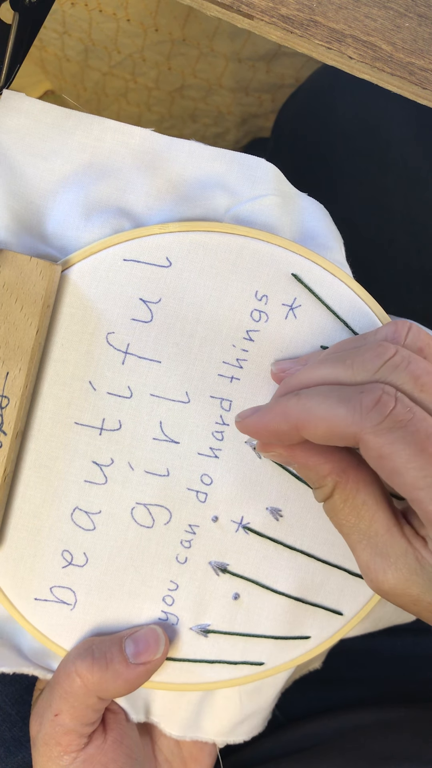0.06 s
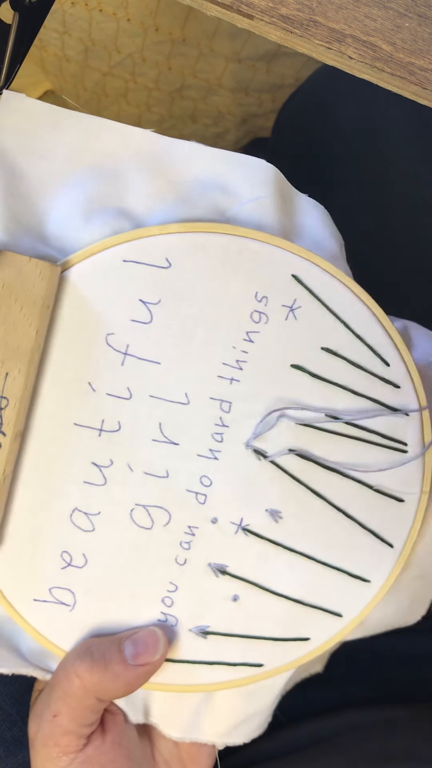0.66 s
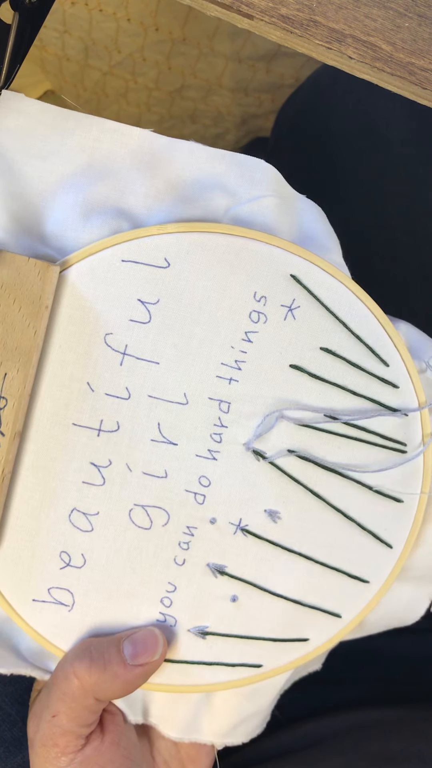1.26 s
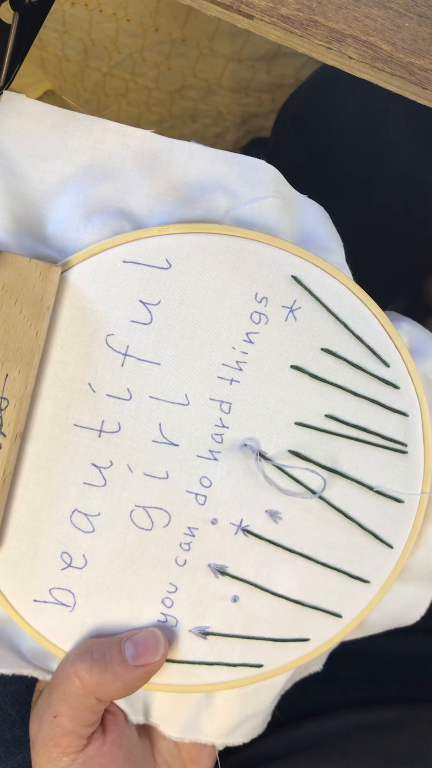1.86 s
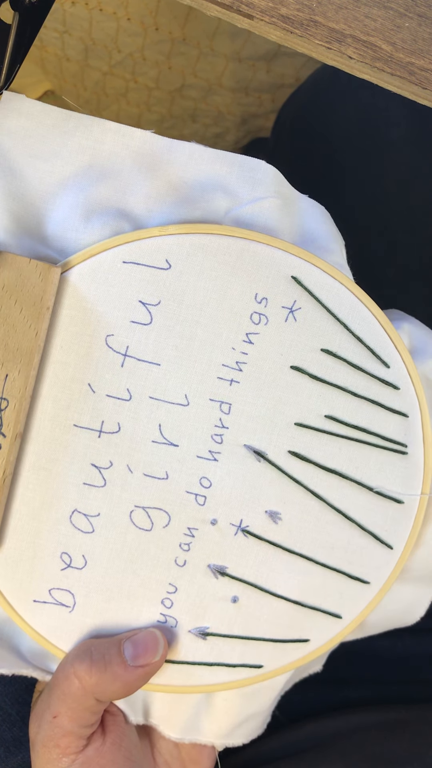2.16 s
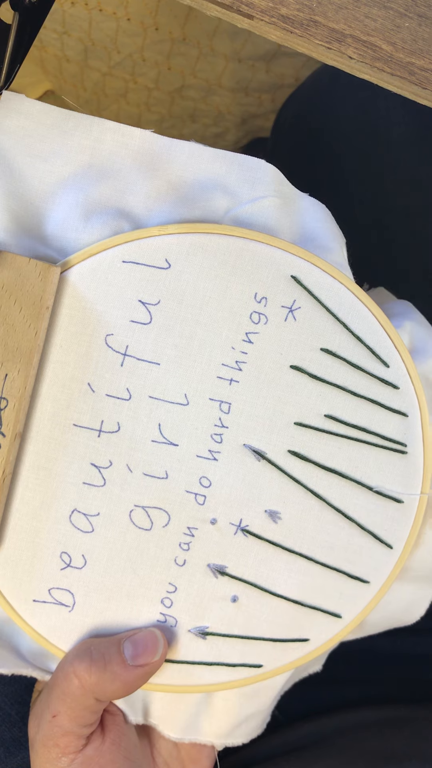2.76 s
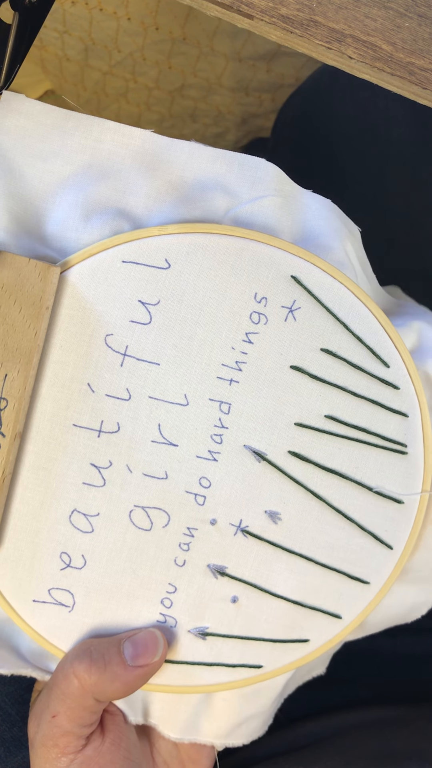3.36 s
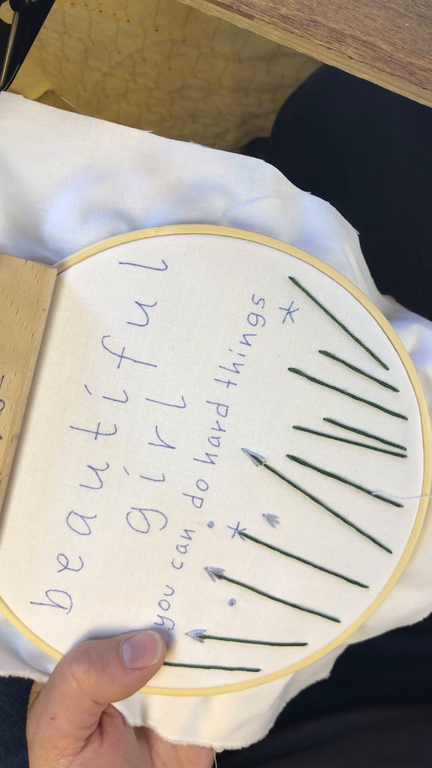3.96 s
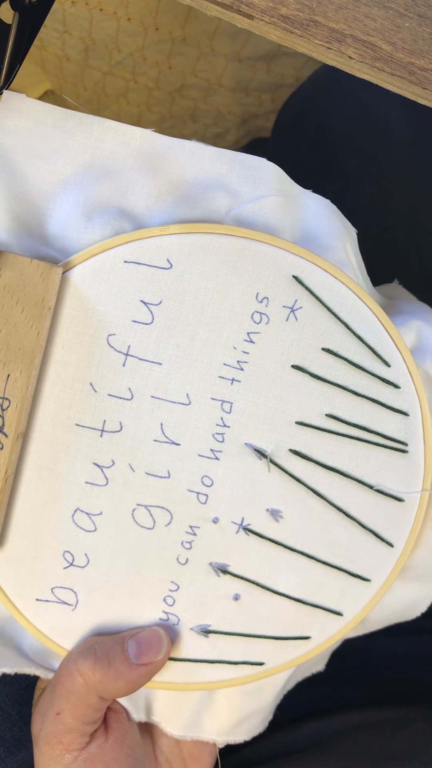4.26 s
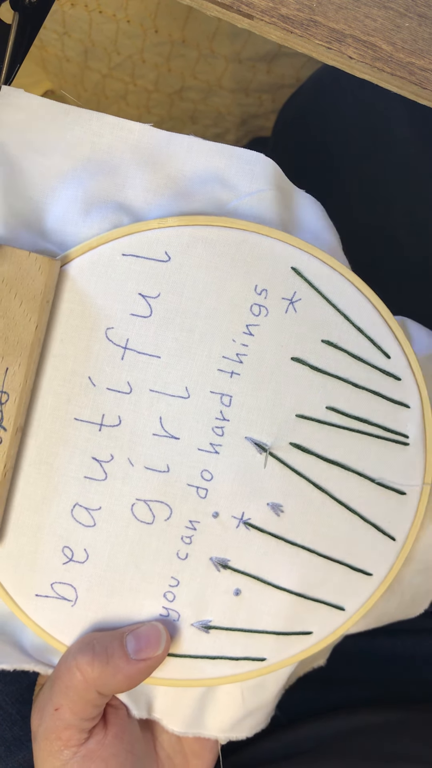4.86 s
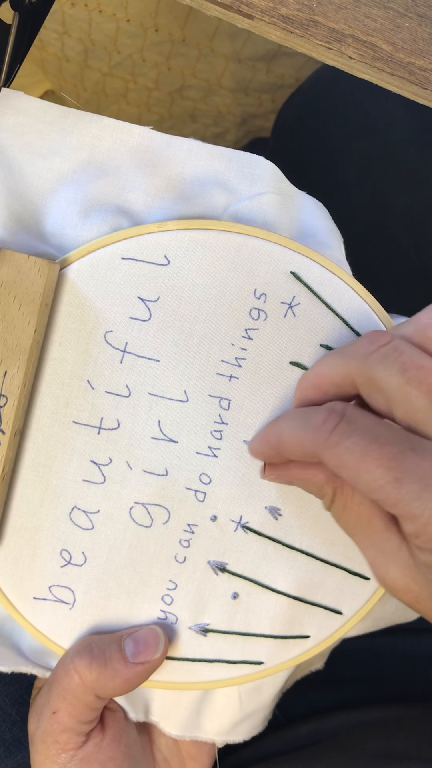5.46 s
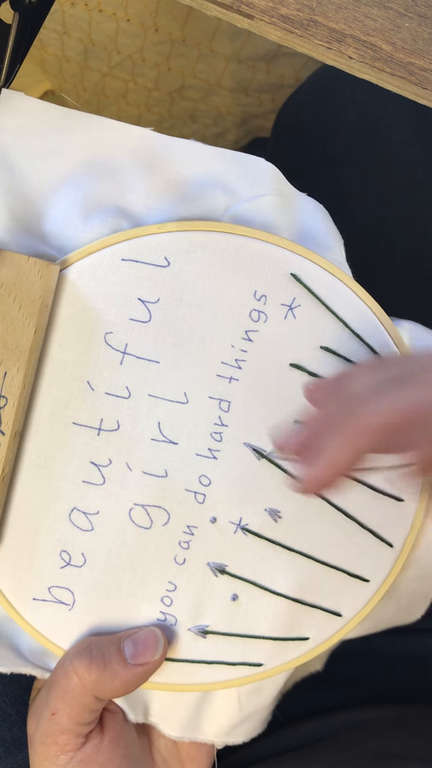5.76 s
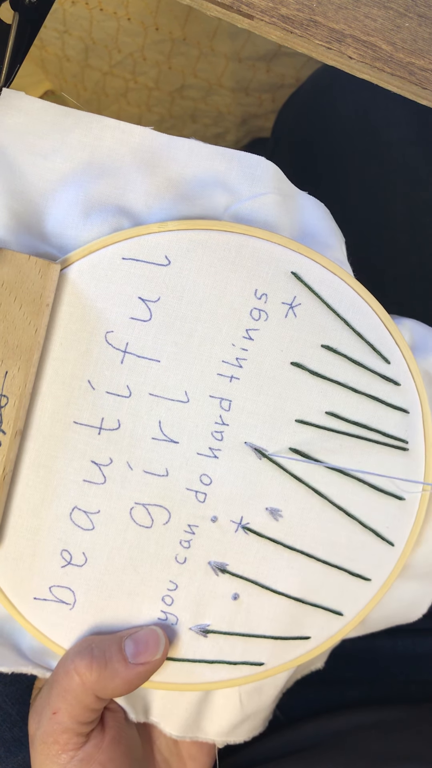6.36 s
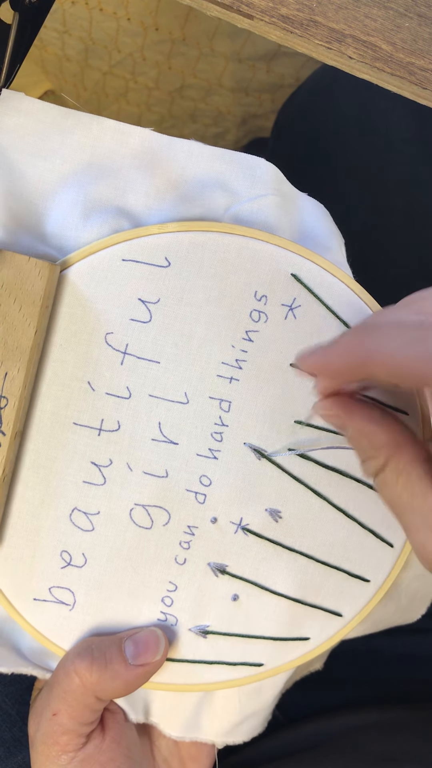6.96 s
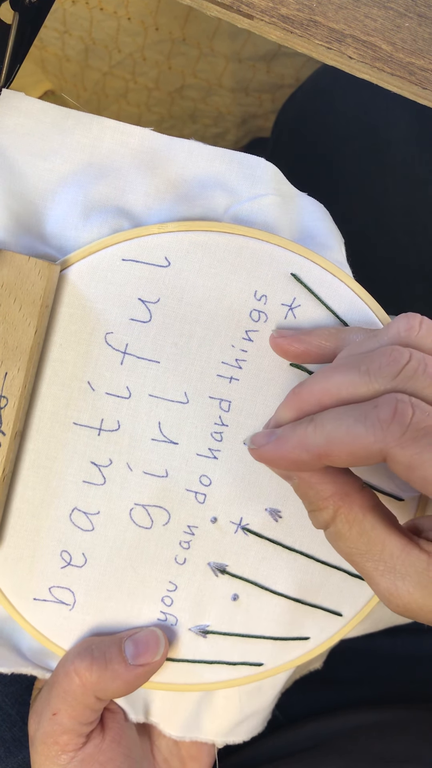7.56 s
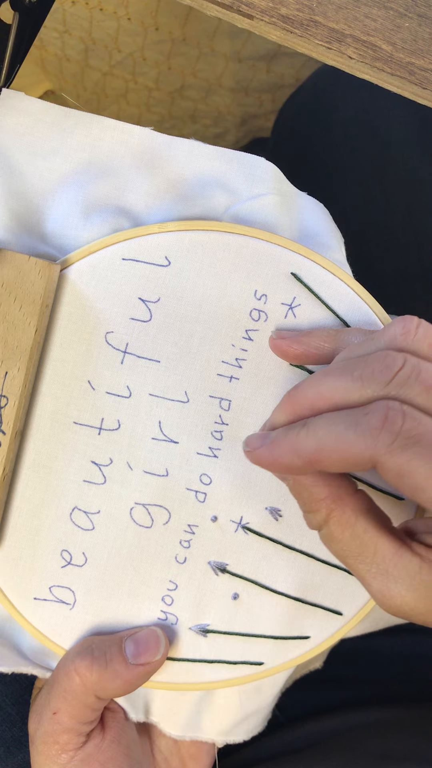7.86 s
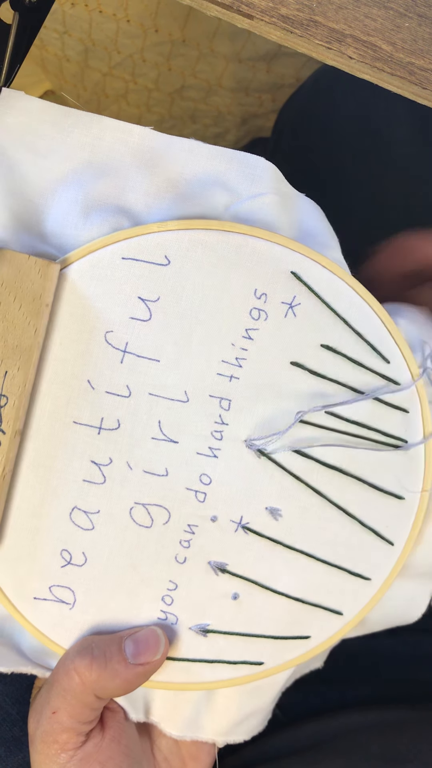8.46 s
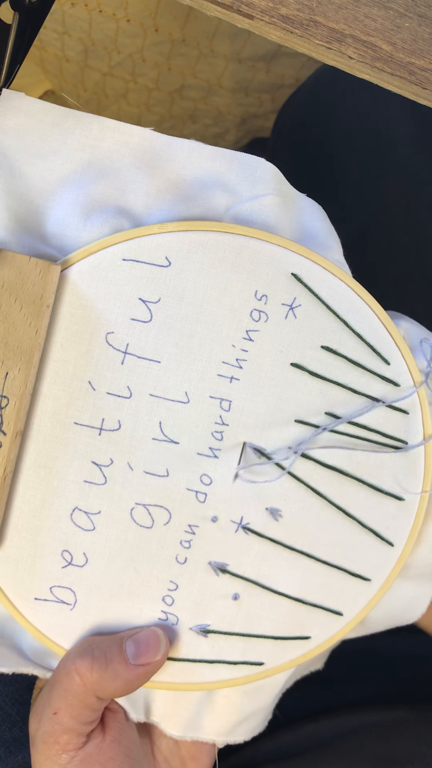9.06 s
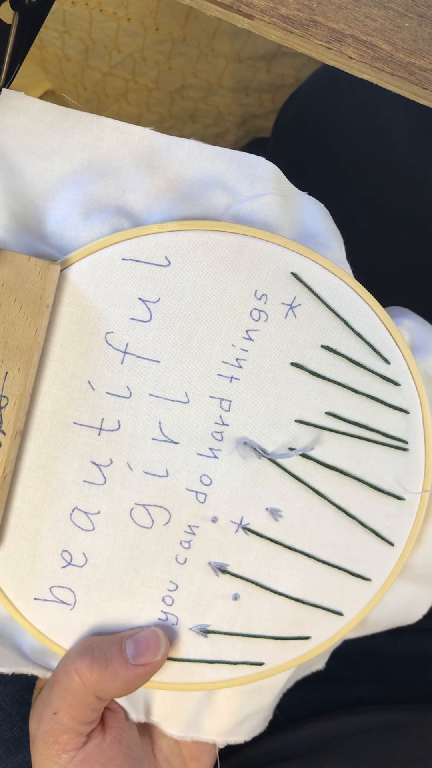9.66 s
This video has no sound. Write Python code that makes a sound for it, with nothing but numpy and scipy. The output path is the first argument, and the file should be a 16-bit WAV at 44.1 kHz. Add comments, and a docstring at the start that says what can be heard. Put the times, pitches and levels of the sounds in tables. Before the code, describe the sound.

A needle pops through cloth stretched in a wooden hoop, making it thump like a small drum, and thread rasps softly after it. This happens three times, a few seconds apart. Between the stitches come light pricks, faint finger rubs and one sharp click of the needle. The sounds are close, in a quiet room with a low rumble and faint appliance hum.

```python
"""Hand embroidery in a quiet room.

Cotton stretched in a wooden hoop rings like a small, slack drum. The needle pricks it and pops
through three times; the thread rasps after it through the weave. Between stitches the needle clicks
on nail and hoop, and fingers bump and rub the cloth. Behind: low rumble and an appliance hum."""
import sys
import numpy as np
from scipy import signal
from scipy.fft import rfft, irfft, next_fast_len
from scipy.io import wavfile
from scipy.ndimage import map_coordinates

SR = 44100
rng = np.random.default_rng(int(sys.argv[2]) if len(sys.argv) > 2 else 0)


def log_audio(samples):
    """Write samples as a 16-bit WAV file to the path given in sys.argv[1]."""
    # one column per channel
    frames = np.atleast_2d(samples).T
    # limit to full scale, then quantise
    limited = np.clip(frames, -1, 1)
    pcm = np.round(limited * 32767).astype(np.int16)
    wavfile.write(sys.argv[1], SR, pcm)


N = 428652

# Needle pop and thread pull:
# start_s, peak_db, contact_hz, tension_ratio, tick_db, pull_s, drag_db, hiss_db, easing_db_per_s
STITCHES = [(1.4664, -12, 1700, 0.956, -40.5, 0.619, -48, -63, 11.5),
            (5.622, -8, 2230, 0.998, -31, 0.5694, -48, -62.5, 5.5),
            (9.143, -10, 1797, 1.002, -38, 0.539, -46.5, -65, 8)]


def pops(give_lead_s=0.012, give_db=-18):
    """The weave gives, then the needle breaks through with a tick and the cloth springs back."""
    out = np.zeros(N)
    for start_s, peak_db, contact_hz, tension, tick_db, *_ in STITCHES:
        give = strike(peak_db + give_db, contact_hz=600, fundamental_db=-4, tension=1.1)
        add(out, start_s - give_lead_s, give)
        add(out, start_s, strike(peak_db, contact_hz, fundamental_db=0.5, tension=tension))
        add(out, start_s, click(tick_db, centre_hz=3700))
    return out


def thread(node_db=-17, reflection_delay_s=0.001, reflection_db=-16):
    """Pulled thread slips through the weave: the cloth hums and the fibres hiss."""
    # Cloth driven from each hole: tension_ratio, fundamental_db, hollow_db, rasp_hz, rasp_db, 3 x node_hz
    holes = [(1.001, -5.5, -3.5, 2440, 0, 705, 1332, 1857),
             (1.011, -4.5, -13.5, 1446, -7.5, 660, 917.8, 1720),
             (1.05, -4, 1.5, 2540, 1.5, 756, 1430, 1870)]
    # Fibre hiss spectrum: freq_hz, density_db
    hiss_spectrum = [(1060, -38.5), (1800, -2), (2390, -2.5), (3160, -3.5), (3530, -1), (3830, -2),
                     (6790, -9), (9160, -4), (10300, -12), (13800, -9.5), (15800, -15)]
    out, t = np.zeros(N), np.arange(SR) / SR
    # a faint echo off a close surface ripples the hiss
    nearby_reflection = lambda hz: 1 - amp(reflection_db) * np.exp(-2j * np.pi * hz * reflection_delay_s)
    for stitch, hole in zip(STITCHES, holes):
        start_s, *_, pull_s, drag_db, hiss_db, easing_db_per_s = stitch
        tension, fundamental_db, hollow_db, rasp_hz, rasp_db, *nodes_hz = hole
        ring = cloth_ring(contact_hz=1935, fundamental_db=fundamental_db, tension=tension)
        hum = signal.fftconvolve(slips(len(t), rate_hz=2500, spread_db=0.5), ring)[:len(t)]
        hollow = lambda hz: amp(hollow_db) * band(hz, 345, q=1.9)
        rasp = lambda hz: amp(rasp_db) * band(hz, rasp_hz, q=4)
        hum = filtered(hum, lambda hz: 1 + hollow(hz) + rasp(hz))
        for node_hz in nodes_hz:  # a mode with a node at the hole is hardly driven
            hum = filtered(hum, lambda hz: 1 - (1 - amp(node_db)) * band(hz, node_hz, q=6.3))
        hiss = slips(len(t), rate_hz=6000, spread_db=0.5)
        hiss = filtered(hiss, lambda hz: amp(along(hiss_spectrum, hz)) * nearby_reflection(hz))
        surge_db = 1.18 * wobble(len(t), rate_hz=25)  # thick and thin stretches drag unevenly
        hum_gain = amp(drag_db + surge_db + pull_db(t, pull_s, easing_db_per_s, eye_db=4.5))
        hiss_gain = amp(hiss_db + surge_db / 2 + pull_db(t, pull_s, easing_db_per_s, eye_db=3))
        add(out, start_s, hum_gain * unit(hum))
        add(out, start_s, hiss_gain * unit(hiss))
    return out


def pull_db(t, pull_s, easing_db_per_s, eye_db, slack_db=-4, release_db_per_s=141.5):
    """Level of a pull: tight doubled thread at the eye, a slack moment, an easing run, release."""
    eye_s, drop_s, slack_s = 0.115, 0.021, 0.076
    onset_db = np.interp(t, np.cumsum([0, eye_s, drop_s, slack_s]), [eye_db, eye_db, slack_db, 0])
    return onset_db - easing_db_per_s * t - release_db_per_s * np.maximum(t - pull_s, 0)


def pricks(tension=1.069, hard_hz=2000, tick_db_per_octave=9):
    """The point feels for its place, stretching and ringing the cloth; harder contact ticks louder."""
    # Needle touches: start_s, peak_db, contact_hz, fundamental_db
    touches = [(1.2253, -43.5, 2430, -10.5), (1.3885, -31.5, 570, 2), (1.406, -33, 400, -0.5),
               (4.043, -40.5, 420, -3), (4.057, -38.5, 397, 1), (4.2974, -28.5, 1823, 3.5),
               (4.3561, -32, 815, -9.5), (4.3741, -30.5, 1220, 5.5), (4.3975, -37, 950, -12),
               (5.539, -25.5, 3520, 2), (5.576, -28, 1800, 1), (6.803, -43, 600, 12.5),
               (7.774, -47.5, 2520, -16.5), (7.799, -32.5, 2492, -13.5), (7.82, -33.5, 988, -5.5),
               (9.04, -39.5, 801, -1), (9.072, -31.5, 770, 1)]
    out = np.zeros(N)
    for start_s, peak_db, contact_hz, fundamental_db in touches:
        add(out, start_s, strike(peak_db, contact_hz, fundamental_db, tension))
        tick_db = peak_db - 19 + tick_db_per_octave * np.log2(contact_hz / hard_hz)
        add(out, start_s, click(tick_db, centre_hz=3400))
    return out


def strike(peak_db, contact_hz, fundamental_db, tension):
    """One blow on the cloth."""
    ring = cloth_ring(contact_hz, fundamental_db, tension)
    return amp(peak_db) * ring / abs(ring).max()


def cloth_ring(contact_hz, fundamental_db, tension, leak_hz=65, dispersion_hz=600, grip_s=0.056):
    """Cloth impulse response. Tension is a pitch ratio; soft contact leaves the high modes still."""
    # Cloth modes, the broad top ones being the snap around the needle: pitch_hz, level_db, t60_s
    cloth_modes = [(109.93, -8, 0.2955), (149, -22.5, 0.16), (301.9, -12, 0.043), (313.3, -15.5, 0.038),
                   (444, -29.5, 0.069), (493.4, -19, 0.055), (565, -45, 0.032), (748, -35.5, 0.1),
                   (977, -20, 0.014), (1156, -16, 0.011), (1405, -32, 0.0099), (1550, -36, .025),
                   (2280, -17.5, 0.0055), (3900, -11, .004)]
    t = np.arange(SR // 2) / SR
    pitch_hz, level_db, t60_s = np.transpose(cloth_modes)[:, :, None]
    modes = amp(level_db - 60 * t / t60_s) * np.cos(2 * np.pi * pitch_hz * tension * t)
    ring = amp(fundamental_db) * modes[0] + modes[1:].sum(0)
    ring *= np.exp(-(t / grip_s) ** 2)  # weave friction stops the last small swings
    contact = signal.butter(3, min(contact_hz, SR / 4), fs=SR, output="sos")
    leak = signal.butter(2, leak_hz, "high", fs=SR, output="sos")  # air round the hoop cancels deep bass
    ring = signal.sosfilt(np.vstack([contact, leak]), ring)
    # all-pass: short waves run ahead of long ones
    return -filtered(ring, lambda hz: ((dispersion_hz - 1j * hz) / (dispersion_hz + 1j * hz)) ** 2)


def clicks():
    """The needle hits nail or hoop, skids a little and jolts the cloth."""
    # Hard contacts: start_s, peak_db, centre_hz, thud_db
    contacts = [(0.4322, -32, 1916, -54), (.4345, -39.5, 2100, -52.5), (0.7354, -48, 3000, -57.5),
                (2.845, -49, 2400, -61), (2.943, -43.5, 2180, -41.5), (3.2042, -44, 2900, -53.5),
                (3.435, -46.5, 2460, -46.5), (3.9942, -14.5, 5100, -37), (6.469, -49, 1100, -63),
                (7.47, -45.5, 1800, -42.5), (7.7988, -37.5, 2460, -61), (7.8187, -42, 5000, -56.5)]
    out = np.zeros(N)
    for start_s, peak_db, centre_hz, thud_db in contacts:
        add(out, start_s, click(peak_db, centre_hz))
        add(out, start_s, rustle(length_s=0.02305, level_db=-69, centre_hz=2037))
        add(out, start_s, strike(thud_db, contact_hz=800, fundamental_db=-2, tension=1.004))
    return out


def click(peak_db, centre_hz, rattle_db=-17, rattle_t60_s=0.019, rattle_top_hz=7000):
    """Steel contact: very short modes and a fine rattle, coloured by the spot struck."""
    # Modes of a hard click: pitch_hz, level_db, t60_s
    click_modes = [(497, 1, 0.015), (753, -3.5, 0.012), (1280, -3, 0.011), (1743, -8.5, 0.013),
                   (2802, -3.5, 0.011), (3293, -4.5, .006), (4000, -9.5, 0.012), (4605, -5.5, 0.0089),
                   (5420, -3.5, 0.0054), (6310, -5, 0.0074), (7200, -8, 0.0067), (10894, -4.5, 0.0058),
                   (12900, 0, 0.004)]
    t = np.arange(SR // 20) / SR
    pitch_hz, level_db, t60_s = np.transpose(click_modes)[:, :, None]
    phase = 2 * np.pi * (pitch_hz * t + rng.random(pitch_hz.shape))
    ring = (amp(level_db - 60 * t / t60_s) * np.cos(phase)).sum(0)
    rattle = amp(rattle_db - 60 * t / rattle_t60_s) * rng.standard_normal(len(t))
    rattle = signal.sosfilt(signal.butter(2, rattle_top_hz, fs=SR, output="sos"), rattle)
    sound = filtered(ring + rattle, lambda hz: band(hz, centre_hz, q=0.64) ** 2)
    return amp(peak_db) * sound / abs(sound).max()


def bumps():
    """A soft fingertip moves little but the lowest mode of the slack cloth."""
    # Fingertip touches: start_s, peak_db
    touches = [(0.462, -46.5), (1.095, -52), (3.993, -38.5), (4.468, -34), (6.916, -45.5), (8.115, -40.5),
               (8.723, -48), (9.111, -33.5)]
    out = np.zeros(N)
    for start_s, peak_db in touches:
        add(out, start_s, strike(peak_db, contact_hz=115, fundamental_db=8, tension=0.89))
    return out


def rubs():
    """A rubbing finger scrapes the weave and sets the cloth humming."""
    # Finger strokes: start_s, length_s, scrape_db, hum_db
    strokes = [(0.269, 0.1704, -61.5, -55), (3.883, 0.1865, -66, -56.5), (6.278, 0.1007, -64.5, -61),
               (6.461, 0.045, -68.5, -71.5), (6.608, .05, -66, -69), (6.916, 0.0215, -57, -64),
               (7.17, 0.137, -66, -73), (7.431, 0.1863, -63, -58), (7.901, 0.191, -62, -55.5),
               (9.066, 0.054, -58, -45)]
    # Scrape spectrum: freq_hz, density_db
    scrape_spectrum = [(200, -7.5), (500, -2.5), (850, 2.5), (1450, -6.5), (1900, -15), (3600, -17),
                       (8000, -28), (15000, -39.5)]
    out = np.zeros(N)
    ring = cloth_ring(contact_hz=1372, fundamental_db=3.5, tension=1.08)
    for start_s, length_s, scrape_db, hum_db in strokes:
        grains = stroke(length_s, rate_hz=3200, spread_db=1.5)
        scrape = filtered(grains, lambda hz: amp(along(scrape_spectrum, hz)))
        hum = signal.fftconvolve(grains, ring / np.linalg.norm(ring))
        add(out, start_s, amp(scrape_db) * unit(scrape))
        add(out, start_s, amp(hum_db) * hum)
    return out


def whisks():
    """Fingers brush the cloth, too lightly to ring it."""
    # Finger brushes: start_s, length_s, level_db, centre_hz
    sweeps = [(0.243, 0.055, -70, 4500), (.388, 0.0923, -69, 8000), (0.719, 0.1, -72, 3770),
              (2.432, 0.084, -72.5, 8860), (2.837, 0.0774, -68.5, 3980), (4.621, 0.111, -70, 2860),
              (7.426, 0.11, -68.5, 3570), (8.091, 0.0565, -69.5, 6990), (8.343, 0.0917, -67, 2730)]
    out = np.zeros(N)
    for start_s, length_s, level_db, centre_hz in sweeps:
        add(out, start_s, rustle(length_s, level_db, centre_hz))
    return out


def rustle(length_s, level_db, centre_hz):
    """A light, broadband scratch on the weave."""
    grains = stroke(length_s, rate_hz=3000, spread_db=1)
    return amp(level_db) * unit(filtered(grains, lambda hz: band(hz, centre_hz, q=0.55) ** 2))


def stroke(length_s, rate_hz, spread_db):
    """Fibre slips that swell and fade."""
    size = int(length_s * SR)
    return unit(slips(size, rate_hz, spread_db) * signal.windows.tukey(size, 0.48))


def slips(size, rate_hz, spread_db):
    """Friction: tiny fibre slips at random times, of unequal strength."""
    impulses = (rng.random(size) < rate_hz / SR) * rng.standard_normal(size)
    return unit(impulses * amp(spread_db * rng.standard_normal(size)))


def fidget(level_db=-80.5, swell_db=1.5, centre_hz=3500):
    """Loose cloth shifts on the lap throughout, in faint grainy swells."""
    grains = filtered(slips(N, rate_hz=1900, spread_db=2.5), lambda hz: band(hz, centre_hz, q=0.44))
    return amp(level_db + swell_db * wobble(N, rate_hz=6)) * unit(grains)


def room(x, delay_s=0.005):
    """Short reverberation of a furnished room."""
    # Room decay: freq_hz, t60_s
    decay = [(100, 0.14), (400, 0.16), (1500, 0.14), (6000, 0.092), (15000, 0.18)]
    hz, t, spectra = signal.stft(rng.standard_normal(SR // 2), SR, nperseg=256)
    tail = signal.istft(spectra * amp(-60 * t / along(decay, hz)[:, None]), SR, nperseg=256)[1]
    response = np.pad(tail / np.linalg.norm(tail), (int(delay_s * SR), 0))
    return signal.fftconvolve(x, response)[:N]


def air(noise_db=-64.5):
    """A distant appliance's wavering hum over the room's rumble and faint hiss."""
    # Appliance hum: pitch_hz, level_db
    hum_lines = [(119, -73.5), (195, -77.5), (241, -76.5)]
    # Background noise spectrum: freq_hz, density_db
    noise_spectrum = [(25, -24), (55, -2), (110, 0.5), (150, -9.5), (300, -10), (450, -16), (1000, -19.5),
                      (1600, -24), (3500, -28), (7800, -34), (9200, -31.5), (10500, -37.5), (13000, -31),
                      (16000, -36.5)]
    hum = np.zeros(N)
    for pitch_hz, level_db in hum_lines:
        line = filtered(rng.standard_normal(N), lambda hz: band(hz, pitch_hz, q=19) ** 2)
        hum += amp(level_db) * unit(line)
    noise = filtered(rng.standard_normal(N), lambda hz: amp(along(noise_spectrum, hz)))
    return hum + amp(noise_db) * unit(noise)


def amp(db):
    """Decibels to gain."""
    return 10 ** (np.asarray(db) / 20)


def unit(x):
    """Scale to rms 1."""
    return x / np.sqrt(np.mean(x ** 2) + 1e-20)


def along(points, hz):
    """Interpolate (freq_hz, value) points on a log frequency axis."""
    freq_hz, values = np.transpose(points)
    return np.interp(np.log(hz + 1), np.log(freq_hz + 1), values)


def filtered(x, response):
    """Apply response(hz) by FFT."""
    size = next_fast_len(len(x) + SR // 10)
    return irfft(rfft(x, size) * response(np.fft.rfftfreq(size, 1 / SR)), size)[:len(x)]


def band(hz, centre_hz, q):
    """Complex response of one resonance."""
    return 1 / (1 + 1j * q * (hz / centre_hz - centre_hz / (hz + 1)))


def wobble(size, rate_hz):
    """Smooth random curve with knots at rate_hz."""
    knots = rng.standard_normal(int(size * rate_hz / SR) + 4)
    return map_coordinates(knots, [np.arange(size) * rate_hz / SR])


def add(track, start_s, sound):
    """Mix sound into track in place."""
    part = track[max(round(start_s * SR), 0):][:len(sound)]
    part += sound[:len(part)]


def scene(room_db=-16.0):
    """The hoop close by, the room far behind; mono."""
    hoop = pricks() + pops() + thread() + clicks() + bumps() + rubs() + whisks()
    return (hoop + amp(room_db) * room(hoop) + fidget() + air())[None]


def record(dry, top_hz=15900):
    """The microphone's band limit."""
    return filtered(dry[0], lambda hz: hz < top_hz)[None]


dry = scene()
out = record(dry)
log_audio(out)
```